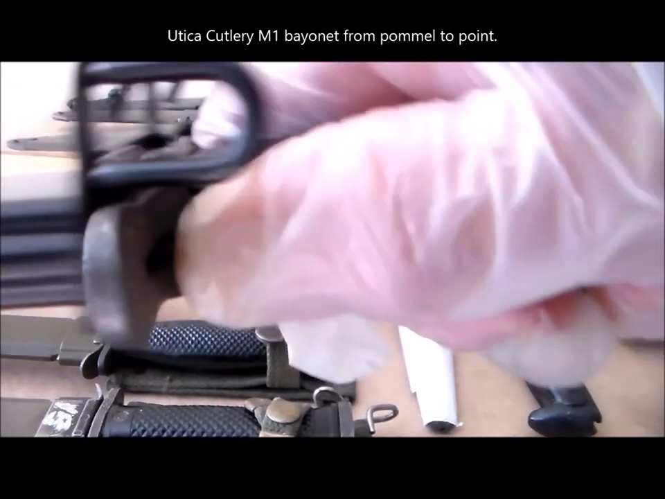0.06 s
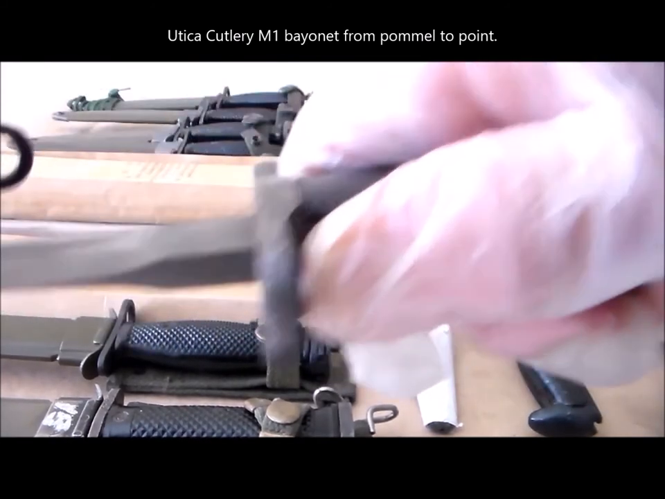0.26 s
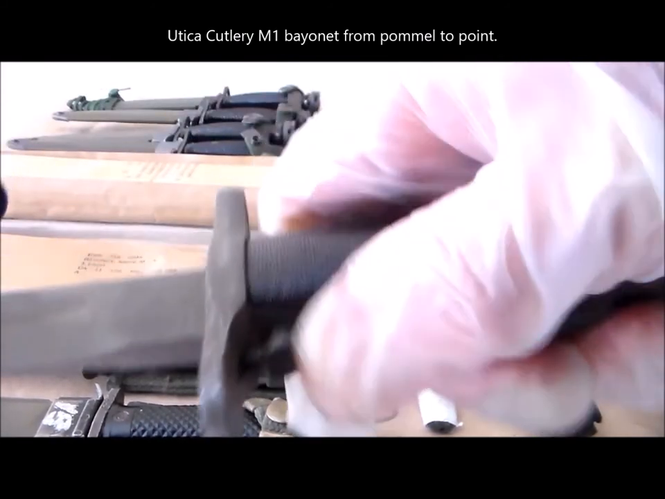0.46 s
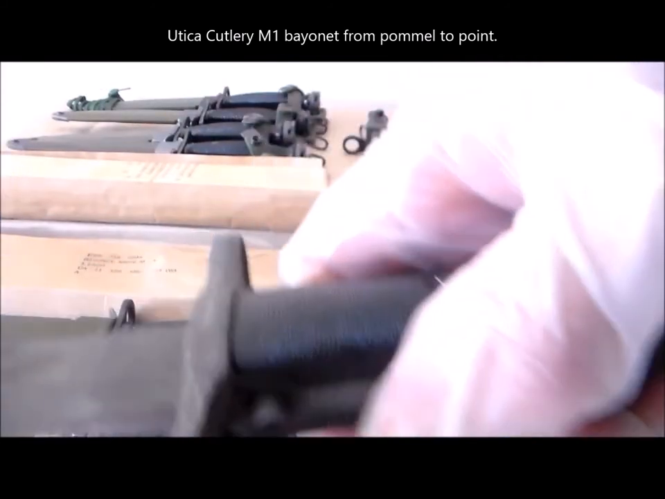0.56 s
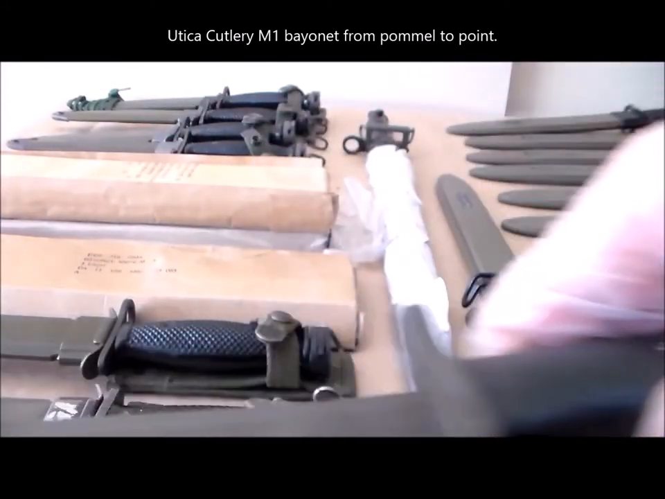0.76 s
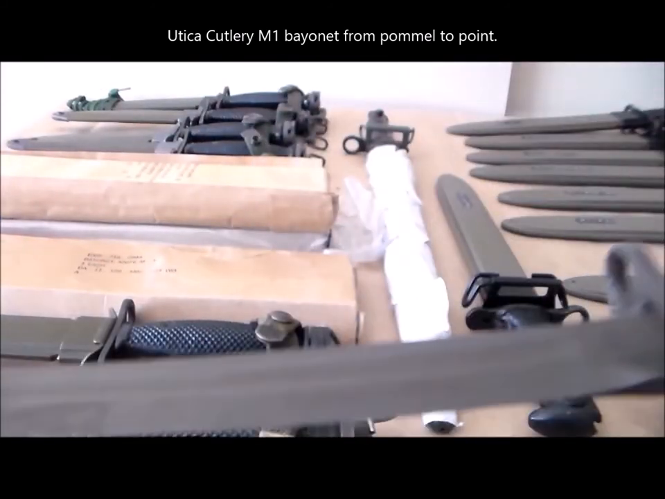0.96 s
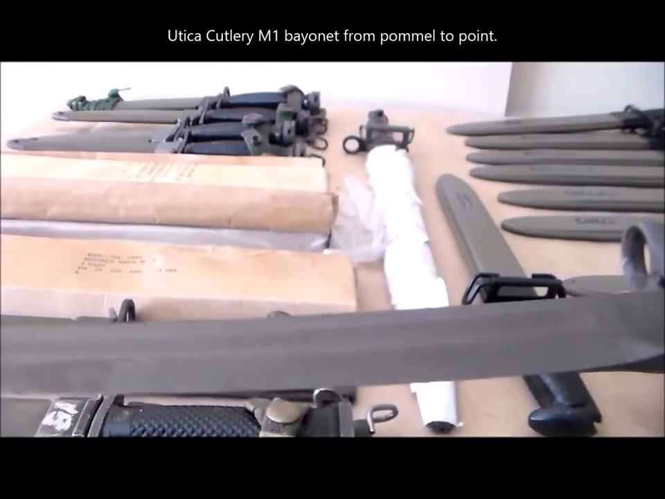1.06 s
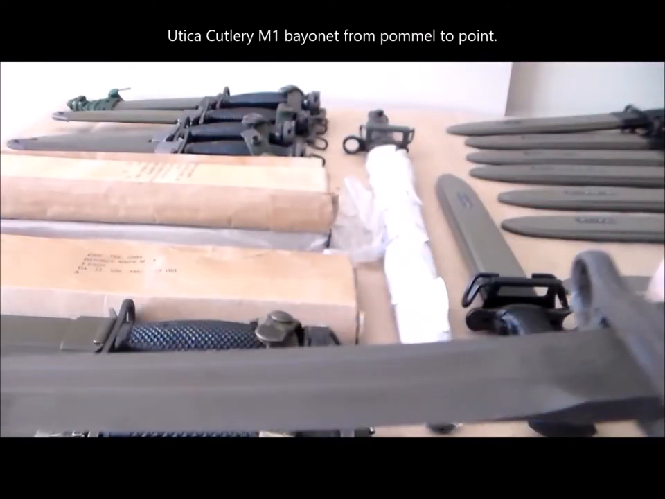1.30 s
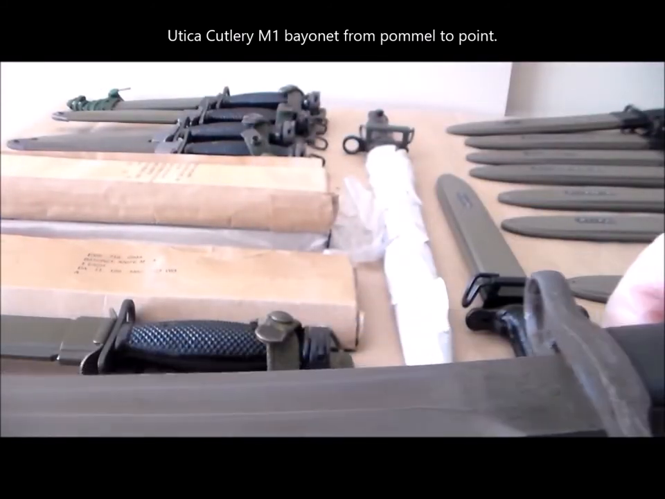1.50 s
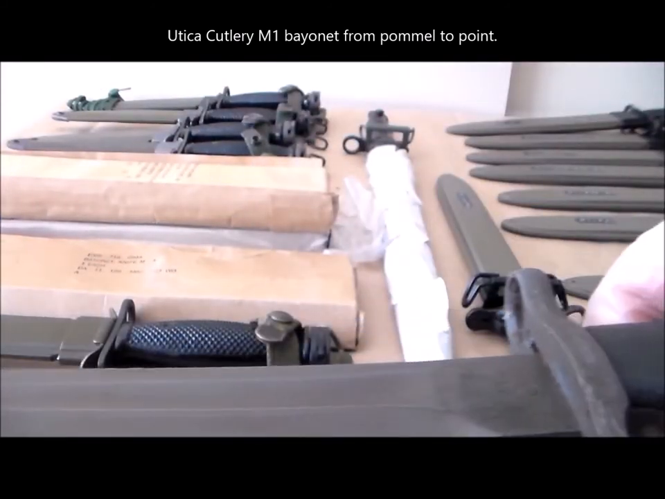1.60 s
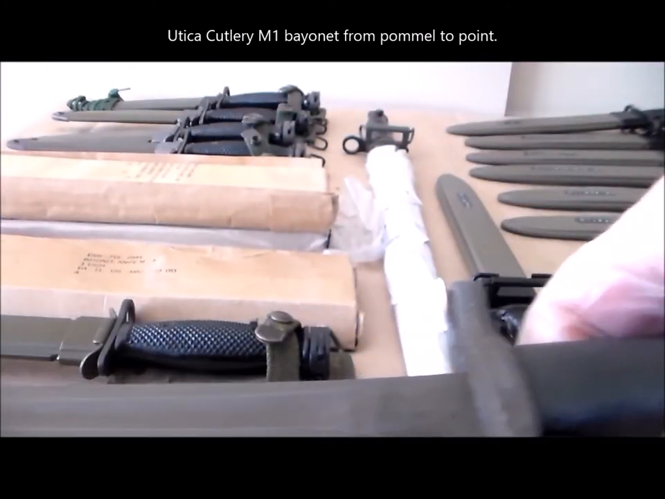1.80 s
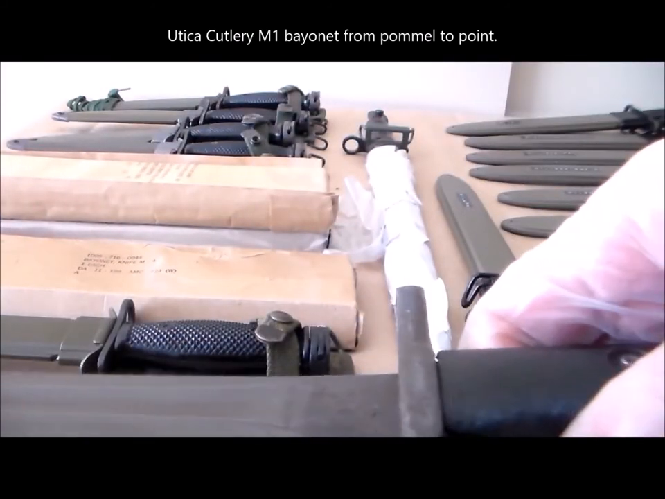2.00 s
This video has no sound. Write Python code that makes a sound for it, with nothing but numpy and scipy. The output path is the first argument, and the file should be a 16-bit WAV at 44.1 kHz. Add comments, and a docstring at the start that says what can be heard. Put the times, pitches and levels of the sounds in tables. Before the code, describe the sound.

A steel blade rasps out of its scabbard, which is then set down on a table.

```python
"""Bayonet drawn, small room

Close to the microphone, the fittings of a steel bayonet click. The blade sticks and slips out of its
scabbard in two rasping pulls and is left ringing faintly. The loose scabbard wobbles and tinks, then
is put down on the table, farther off, with a thump and a second, lighter clack."""
import sys
import numpy as np
from scipy import signal
from scipy.fft import rfft, irfft, next_fast_len
from scipy.io import wavfile
from scipy.ndimage import uniform_filter1d, map_coordinates

SR = 44100
rng = np.random.default_rng(int(sys.argv[2]) if len(sys.argv) > 2 else 0)


def wav_record(signal):
    """Record a signal, one row per channel, as 16-bit PCM in the file named by sys.argv[1]."""
    frames = np.transpose(np.atleast_2d(signal))
    bounded = np.clip(frames, -1, 1)
    # unit amplitude maps onto the largest positive 16-bit level
    quanta = np.round(bounded * 32767).astype(np.int16)
    wavfile.write(sys.argv[1], SR, quanta)


N = 90404
T = np.arange(N) / SR
M = next_fast_len(N + SR // 2, True)
HZ = np.fft.rfftfreq(M, 1 / SR)


# first pull, close and gritty: t/s, level/dB
FIRST_PULL = [(.19, -69), (.198, -54), (.21, -49), (.22, -39), (.24, -37), (.254, -32.5), (.266, -37),
              (.31, -44), (.333, -66), (.364, -62), (.372, -50), (.394, -60), (.44, -72)]
# its spectrum: f/Hz, gain/dB
FIRST_COLOUR = [(100, -33.5), (450, -32), (730, -20.5), (1300, -23), (1800, -14.5), (3100, -20.5),
                (3700, -7.5), (4500, -7.5), (5400, -15.5), (8000, -23), (14000, -30)]
# squeal in the scabbard's throat: t/s, f/Hz, level/dB
SQUEAL = [(.268, 1699, -53.5), (.278, 1727, -44), (.295, 1720, -50.5), (.311, 1827, -44), (.326, 1950, -52),
          (.334, 1900, -86)]
def first_pull():
    """Right at the microphone, the blade judders free of the scabbard's springs and squeals briefly."""
    judder = friction(slips_per_s=260, slip_s=0.014, scatter_db=8.5, hiss=0.043)
    rasp = coloured(stroke(FIRST_PULL) * judder, steel(FIRST_COLOUR))
    hz, db = curves(SQUEAL)
    phase = 2 * np.pi * np.cumsum(hz * (1 + 0.022 * drift(400))) / SR
    squealing = (T > SQUEAL[0][0]) * (T < SQUEAL[-1][0])
    return rasp + squealing * amp(db + 1.2 * drift(250)) * quadrature(phase)


# the springs biting in the first pull: t/s, f/Hz, level/dB
BITES = [(.2121, 4500, -29.5), (.2185, 4100, -33.5), (.228, 4150, -31), (.237, 4100, -35.5),
         (.244, 3600, -27), (.2485, 3900, -26), (.2565, 4200, -25.5), (.2602, 4100, -25.5)]
def bites():
    """The springs grip and let go in a quick run of hard slips, each a rough chirp."""
    attack_s, hold_s, t60_s = 0.00031, .0026, .006
    rasp = amp(-6) * coloured(noise(), steel(FIRST_COLOUR))
    out = np.zeros((2, N))
    for s, hz, db in BITES:
        grip = np.clip(since(s) / attack_s, 0, 1) * amp(db - 60 * since(s + hold_s) / t60_s)
        out += grip * unit(shaken(hz, shake_hz=.06 * hz, rate=2000) + rasp)
    return out


# second pull, along the whole blade: t/s, relative level/dB, bass/dB, treble/dB
SECOND_PULL = [(.71, -72, 9.5, 0.5), (.768, -45.5, 5, -6), (.824, -41.5, 3.5, -2), (.83, -33, 4, -7),
               (.84, -38.5, 3.5, 0.5), (.886, -37, -4, -1.5), (.906, -42, 1, 3), (.932, -37.5, -4, 0),
               (.954, -32, -3, -5), (.97, -36.5, -5, 3.5), (.992, -41.5, 1, 3), (.997, -55, -7, -1)]
# its spectrum: f/Hz, gain/dB
SECOND_COLOUR = [(100, -24.5), (270, -46), (380, -18.5), (520, -23.5), (750, -14.5), (1000, -16),
                 (1600, -3), (2050, -10), (3000, -2), (3700, -2.5), (4500, -1), (5600, -9.5), (8000, -9.5),
                 (11000, -20.5), (14000, -24)]
def second_pull():
    """The blade slides out with a finer, gritty rasp that thins and brightens toward the point."""
    grain = friction(slips_per_s=390, slip_s=0.0033, scatter_db=1, hiss=0.22)
    grit = amp(-7) * friction(slips_per_s=130, slip_s=.0012, scatter_db=4.5, hiss=.02)
    scrape = amp(-0.5) * stroke(SECOND_PULL) * (grain + grit)
    rasp = wander(coloured(scrape, steel(SECOND_COLOUR)))
    bass = signal.sosfiltfilt(signal.butter(2, 1200, "low", fs=SR, output="sos"), rasp)
    treble = signal.sosfiltfilt(signal.butter(2, 5600, "high", fs=SR, output="sos"), rasp)
    _, bass_db, treble_db = curves(SECOND_PULL)
    return rasp + (amp(bass_db) - 1) * bass + (amp(treble_db) - 1) * treble


def friction(slips_per_s, slip_s, scatter_db, hiss):
    """Stick and slip: short bursts at uneven intervals over a steady hiss, at an even mean level."""
    gap, strength = rng.standard_normal((4000, 2)).T
    at = (np.cumsum(np.exp(.45 * gap)) / slips_per_s * SR).astype(int)
    kicks = np.bincount(at[at < N], amp(2 * scatter_db * strength[at < N]), N)
    power = signal.lfilter([1], [1, -np.exp(-2 / (slip_s * SR))], kicks)
    power = power / power.mean() + hiss
    return noise() * np.sqrt(power / np.abs(uniform_filter1d(power, size=700)))


# resonances of the blade and scabbard: f/Hz
STEEL_HZ = [690, 1180, 1740, 2250, 2862, 3010, 3470, 4000, 4275, 4420, 4995, 9450]
# their shapes, in the same order: width/Hz, lift/dB
STEEL_PEAKS = [(35, 5.55), (50.7, 4), (79.5, 4.45), (35, 7.2), (64.3, 4.9), (30.24, 0.72), (30, 5.2),
               (40, 7.2), (45.9, 6.1), (24.95, 1.8), (34.8, 1.8), (90, 5.3)]
def steel(colour):
    """A spectrum with the steel's resonances standing out of it."""
    return resonant(colour, [(hz, width, db) for hz, (width, db) in zip(STEEL_HZ, STEEL_PEAKS)])


def wander(x, depth_db=9.3):
    """Each resonance of the steel swells and fades on its own as the contact slides."""
    spectrum = rfft(x, M)
    for hz, (width, _) in zip(STEEL_HZ, STEEL_PEAKS):
        band = irfft(spectrum / (1 + ((HZ - hz) / width) ** 2), M)[:, :N]
        x = x + band * (amp(depth_db * np.tanh(drift(45))) - 1)
    return x


# resonances that catch as the point of contact moves: t/s, length/s, f/Hz, level/dB
CATCHES = [(.247, .012, 2850, -35), (.256, .014, 1800, -41), (.824, .028, 2850, -41), (.83, .025, 390, -54),
           (.83, .011, 4280, -33), (.834, .03, 4030, -39), (.866, .06, 1690, -43), (.868, .026, 6870, -47),
           (.875, .04, 5020, -43), (.887, .014, 2230, -39), (.929, .035, 4020, -40),
           (.945, .026, 2860, -35), (.955, .02, 4560, -39), (.958, .022, 3040, -35), (.955, .04, 2255, -42),
           (1.484, .011, 4000, -38)]
def catches():
    """Narrow resonances swell and fade, their phase shaken by the scraping."""
    return sum(amp(db) * np.exp(-(2 * (T - s) / length) ** 2) * shaken(hz, shake_hz=55, rate=300)
               for s, length, hz, db in CATCHES)


# modes of the blade as it comes free: t/s, f/Hz, level/dB, t60/s
BLADE_MODES = [(.96, 6567, -34.5, .15), (.955, 2250, -40, .15)]
def blade():
    """The freed blade's ring builds up, rough while the point still scrapes and clean afterwards."""
    scraping = T < SECOND_PULL[-1][0]
    return sum(struck(s, db, t60, attack_s=.014) * shaken(hz, shake_hz=45 * scraping, rate=500)
               for s, hz, db, t60 in BLADE_MODES)


# fittings near the microphone: t/s, level/dB, hold/s, t60/s, bass/dB, treble/dB
CLICKS = [(.0197, -48, 0.0014, 0.025, -3, -24), (.0442, -52, 0.002, 0.0088, -1, -12),
          (.131, -39.5, 0.0026, 0.0052, -8.5, -3), (.198, -48.5, 0.0039, 0.073, 6, 1),
          (.3596, -35.5, 0.0034, 0.02, 1.5, -2.5), (.384, -43.5, 0.0048, 0.051, -1, 2),
          (.409, -47.5, 0.0054, 0.09, 2.5, 2.5), (.525, -55.5, 0.00066, 0.0063, -19, -0.5),
          (.595, -55.5, 0.0031, 0.014, -24, -2.5), (.767, -43.5, 0.0049, 0.015, -6, -22),
          (.786, -44, 0.0042, 0.011, -2, -6.5), (.8275, -32, 0.0016, 0.019, 4, 1),
          (1.139, -55.5, 0.00088, 0.028, 2, -11), (1.256, -66, 0.0013, 0.017, 14, -6.5)]
# their spectrum: f/Hz, gain/dB
CLICK_COLOUR = [(80, -35.5), (400, -11.5), (1200, -3), (2100, -3), (3000, -1), (4500, 5.5), (6500, -6),
                (10000, -14), (14000, -15)]
def clicks():
    """The fittings click, sounding the steel's resonances."""
    return contacts(CLICKS, steel(CLICK_COLOUR))


def contacts(rows, body, snap=2.2):
    """Each contact snaps, chatters for a moment and dies away, with its own bass and treble."""
    bass = 1 / (1 + (HZ / 1700) ** 4)
    treble = 1 - 1 / (1 + (HZ / 5500) ** 6)
    out = np.zeros((2, N))
    for s, db, hold, t60, bass_db, treble_db in rows:
        chatter = (T >= s) * amp(-60 * since(s + hold) / t60) * noise()
        chatter[:, round(s * SR)] += snap
        out += amp(db) * coloured(chatter, body * amp(bass_db * bass + treble_db * treble))
    return out


# knocks on the table: t/s, level/dB, hold/s, t60/s, bass/dB, treble/dB
KNOCKS = [(1.464, -27.5, 0.002, 0.027, 7.5, 7), (1.472, -30, 0.00083, 0.018, -5.5, -6.5),
          (1.5627, -34.5, 0.0023, .004, -12.5, -3.5), (1.5648, -31, 0.0017, 0.016, -5, 3),
          (1.901, -63, 0.003, 0.097, 20, -9)]
# their spectrum: f/Hz, gain/dB
KNOCK_COLOUR = [(50, -28), (130, -8.5), (480, -15), (730, -4), (1100, -5), (1550, -0.5), (2200, -8),
                (3100, -8), (4000, -5), (5400, -11), (7500, -14), (10000, -23), (14000, -29)]
# resonances of the scabbard's shell: f/Hz, width/Hz, lift/dB
SHELL_PEAKS = [(2840, 130, 10), (3510, 150, 8), (4020, 260, 4), (6200, 400, 7), (7750, 350, 5)]
# thumps of the table: t/s, level/dB
THUMPS = [(1.466, -31.5), (1.567, -44.5)]
# modes of the table: f/Hz, relative level/dB, t60/s
TABLE_MODES = [(104, -9, 0.08), (132, 0, 0.082), (223.3, -16, 0.32)]
# the scabbard skidding and settling: t/s, level/dB
SKID = [(1.47, -54), (1.485, -47), (1.51, -42.5), (1.535, -59), (1.58, -50.5), (1.66, -71.5), (1.76, -103)]
# its spectrum: f/Hz, gain/dB
SKID_COLOUR = [(70, -25), (130, -1.5), (230, 0.5), (400, -7), (650, -4), (1000, -15.5), (1600, -8),
               (2300, -4.5), (3700, -5.5), (5500, -9), (7800, -12), (10000, -16.5), (14000, -24.5)]
def put_down():
    """Farther from the microphone, the scabbard knocks and skids, with the table's thump underneath."""
    thump = sum(ring(s, hz, db + mode_db, t60, attack_s=0.0018)
                for s, db in THUMPS for hz, mode_db, t60 in TABLE_MODES)
    scrape = friction(slips_per_s=240, slip_s=0.0079, scatter_db=11, hiss=0.76)
    skid = coloured(stroke(SKID) * scrape, amp(along(SKID_COLOUR)))
    return contacts(KNOCKS, resonant(KNOCK_COLOUR, SHELL_PEAKS)) + thump + skid


# struck modes: t/s, f/Hz, level/dB, t60/s
RINGS = [(.2122, 760, -35, .014), (.3592, 2080, -27.5, .017), (.3592, 4800, -27, .012),
         (.3592, 4050, -30, .016), (1.464, 4020, -26, .037), (1.465, 3490, -38, .12),
         (1.565, 3520, -43, .06), (1.464, 1450, -29, .014), (.3592, 450, -41, .018)]
def after_rings():
    """Fittings, scabbard and table ring briefly after a blow."""
    return sum(ring(s, hz, db, t60, attack_s=0.00031) for s, hz, db, t60 in RINGS)


# modes of the belt hook: f/Hz, level/dB, t60/s
HOOK_MODES = [(5040, -25.5, 0.0035), (6520, -31.5, 0.0033), (8100, -58, .003)]
def hook_tick(at_s=.0644):
    """The belt hook touches the scabbard once, with almost no ring."""
    return sum(ring(at_s, hz, db, t60, attack_s=.0001) for hz, db, t60 in HOOK_MODES)


def swinging(shudder_hz=29, first_tink_s=1.142, tink_period_s=.066):
    """The loose scabbard shudders, and a swinging fitting tinks at a steady beat."""
    tinks = sum(ring(first_tink_s + k * tink_period_s, hz=2847, db=-43.5, t60=0.028, attack_s=0.0041)
                for k in range(5))
    loose = uniform_filter1d(1. * (T > 1.05) * (T < 1.4), size=2000)
    shudder = unit(quadrature(2 * np.pi * shudder_hz * T))
    return tinks + loose * amp(-62 + 1.5 * drift(3.4)) * shudder


# soft sliding: t/s, level/dB
SLIDING = [(0, -60.5), (.03, -55.5), (.06, -63.5), (.14, -62.5), (.18, -70.5), (.34, -58), (.48, -75.5),
           (.66, -68), (.72, -80), (1.0, -55), (1.1, -64.5), (1.2, -66.5), (1.395, -69), (1.425, -56.5),
           (1.465, -51.5)]
# its spectrum: f/Hz, gain/dB
SLIDING_COLOUR = [(80, -14.5), (400, -16.5), (700, -7), (1000, -10), (2400, -4.5), (3400, -2.5), (4500, -2),
                  (6000, -9), (10000, -13), (14000, -18)]
def sliding():
    """Hand and scabbard rub lightly between the strokes."""
    rub = friction(slips_per_s=140, slip_s=0.0036, scatter_db=2, hiss=1.7)
    return coloured(stroke(SLIDING) * rub, steel(SLIDING_COLOUR))


# handling rumble: t/s, level/dB
RUMBLE = [(0, -56.5), (.26, -61.5), (.275, -72), (.8, -75), (.84, -64), (1.0, -66), (1.4, -62), (1.8, -70)]
# its spectrum: f/Hz, gain/dB
RUMBLE_COLOUR = [(10, -2.5), (30, 5.5), (50, -6.5), (100, -14), (250, -15.5), (600, -22.5), (2000, -92)]
def handling_rumble():
    """Low noise rises and falls with the handling."""
    rumble = amp(curves(RUMBLE)[0]) * coloured(noise(), amp(along(RUMBLE_COLOUR)))
    return spread(rumble, [(30, -7.5), (300, -4.0)])


# decay of the small room: f/Hz, t60/s
ROOM_DECAY = [(100, 0.79), (1000, 0.46), (4000, 0.39), (12000, 0.34)]
# stereo width of the direct sound: f/Hz, side over mid/dB
DIRECT_WIDTH = [(100, -24.5), (1000, -16.5), (2500, -13.5), (4200, -13), (5500, -3), (7000, 2),
                (10000, -0.5), (13500, 3)]
# stereo width of the room's answer: f/Hz, side over mid/dB
ROOM_WIDTH = [(100, -20.5), (600, -24), (2500, -10), (5500, 1.5), (12000, 0.5)]
def in_room(pair, wet_db, build_s=0.0036):
    """Left and right at the microphone: direct sound plus the room's answer, whose highs die first."""
    hz, t, frames = signal.stft(rng.standard_normal((2, SR * 3 // 4)), SR, nperseg=256)
    t60 = np.interp(hz, HZ, along(ROOM_DECAY))[:, None]
    _, tail = signal.istft(frames * amp(-60 * t / t60), SR, nperseg=256)
    tail *= 1 - np.exp(-np.arange(tail.shape[1]) / SR / build_s)
    answer = signal.fftconvolve(pair[:1], tail / np.linalg.norm(tail[0]), axes=1)[:, :N]
    return spread(pair, DIRECT_WIDTH) + amp(wet_db) * spread(answer, ROOM_WIDTH)


# spectrum of the noise floor: f/Hz, gain/dB
FLOOR_COLOUR = [(24, -37.5), (40, -9.5), (88, -24), (130, -28.5), (856, -22), (2340, -22.5), (14000, -28)]
# its stereo width: f/Hz, side over mid/dB
FLOOR_WIDTH = [(60, 4), (180, 8.5), (1640, 1), (14900, -0.5)]
def noise_floor():
    """A faint, wide, steady hiss lies behind everything."""
    return spread(amp(-75) * coloured(noise(), amp(along(FLOOR_COLOUR))), FLOOR_WIDTH)


def amp(db):
    """Decibels to gain."""
    return 10 ** (np.asarray(db) / 20)


def unit(x):
    """Scale to rms 1."""
    return x / np.sqrt(np.mean(x ** 2) + 1e-20)


def since(s):
    """Seconds since time s, zero before it."""
    return np.maximum(T - s, 0)


def along(points):
    """(f/Hz, value) points read on a log axis."""
    hz, values = np.transpose(points)
    return np.interp(np.log(HZ + 1), np.log(hz), values)


def curves(rows):
    """One value per sample for each column after the time."""
    s, *columns = np.transpose(rows)
    return [np.interp(T, s, column) for column in columns]


def stroke(rows):
    """Gain of a level curve, silent outside its span."""
    return amp(curves(rows)[0]) * (T >= rows[0][0]) * (T <= rows[-1][0])


def drift(rate):
    """A smooth random curve, rate knots a second."""
    return map_coordinates(rng.standard_normal(8192), [T * rate], mode="wrap")


def noise():
    """White noise as a (mid, side) pair."""
    return rng.standard_normal((2, N))


def quadrature(phase):
    """A tone as a (mid, side) pair, a quarter cycle apart."""
    return np.array([np.sin(phase), np.cos(phase)])


def shaken(hz, shake_hz, rate):
    """A (mid, side) tone of rms 1 whose pitch is shaken at random."""
    return unit(quadrature(2 * np.pi * np.cumsum(hz + shake_hz * drift(rate)) / SR))


def struck(s, db, t60, attack_s):
    """Envelope that rises at time s and dies away."""
    t = since(s)
    return amp(db - 60 * t / t60) * (1 - np.exp(-t / attack_s))


def ring(s, hz, db, t60, attack_s):
    """One decaying mode as a (mid, side) pair."""
    phase = np.array([[0], [rng.uniform(0, 2 * np.pi)]])
    return struck(s, db, t60, attack_s) * np.sin(2 * np.pi * hz * since(s) + phase)


def resonant(colour, modes):
    """A spectrum with (f/Hz, width/Hz, lift/dB) resonances standing out of it."""
    lift = sum(np.abs(amp(db) ** 2 - 1) / (1 + (2 * (HZ - hz) / width) ** 2) for hz, width, db in modes)
    return amp(along(colour)) * np.sqrt(1 + lift)


def coloured(x, gain):
    """Causal filter with this gain shape; white noise keeps its power."""
    cepstrum = irfft(np.log(np.maximum(unit(gain), 1e-6)), M)
    cepstrum[1:M // 2] *= 2  # fold to minimum phase
    cepstrum[M // 2 + 1:] = 0
    return irfft(rfft(x, M) * np.exp(rfft(cepstrum)), M)[..., :N]


def spread(pair, width):
    """A (mid, side) pair to left and right, with this width at each frequency."""
    side = irfft(rfft(pair[1], M) * amp(along(width)), M)[:N]
    return np.array([pair[0] + side, pair[0] - side])


def scene():
    """Three distances: the room answers more as the scabbard moves away from the microphone."""
    near = in_room(first_pull() + bites() + hook_tick() + clicks(), wet_db=-22.5)
    middle = in_room(after_rings() + second_pull() + catches() + blade() + sliding() + swinging(),
                     wet_db=-18)
    far = in_room(put_down(), wet_db=-14)
    return near + middle + far + handling_rumble() + noise_floor()


def record(dry):
    """A steep low-pass cuts off the highest treble."""
    top_hz = 14300
    return irfft(rfft(dry, M) / np.sqrt(1 + (HZ / top_hz) ** 160), M)[:, :N]


dry = scene()
out = record(dry)
wav_record(out)
```